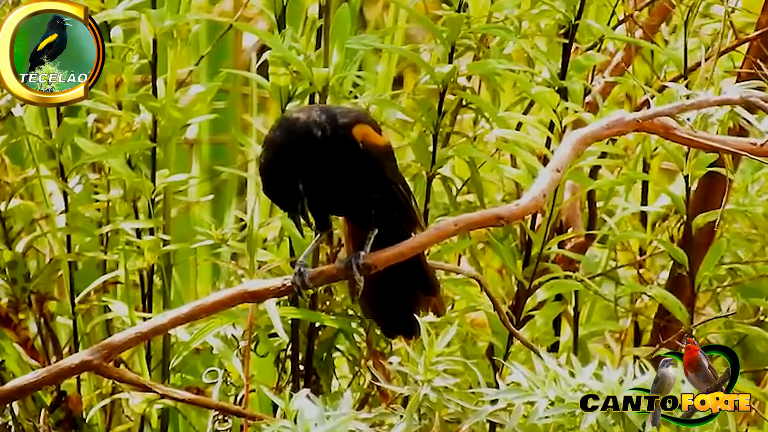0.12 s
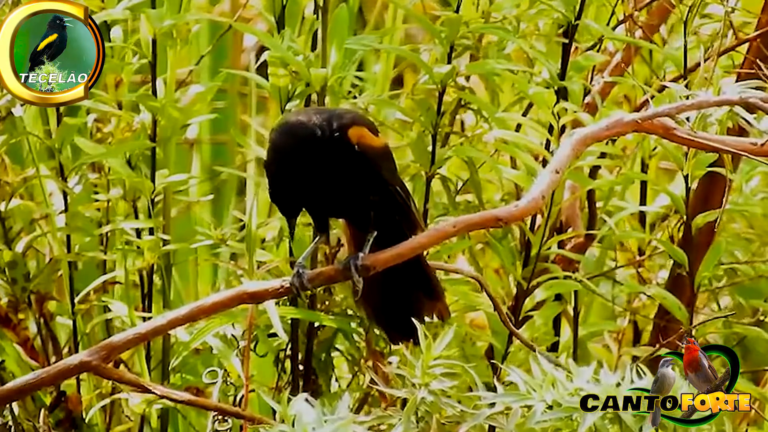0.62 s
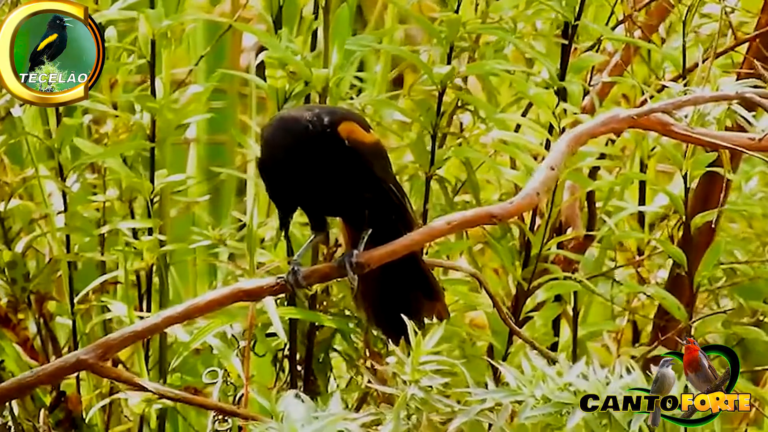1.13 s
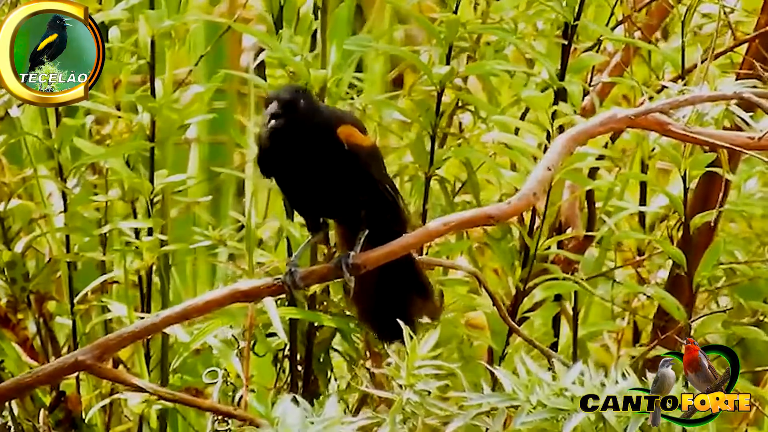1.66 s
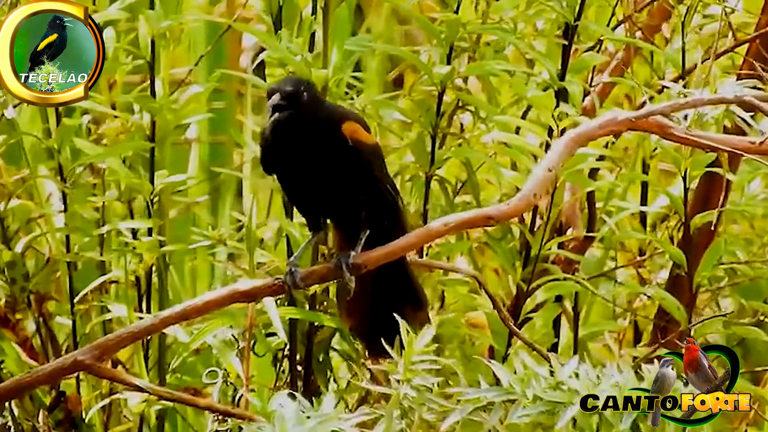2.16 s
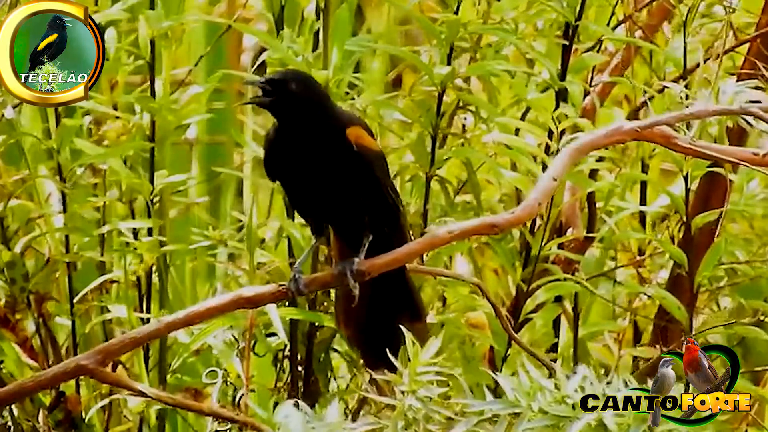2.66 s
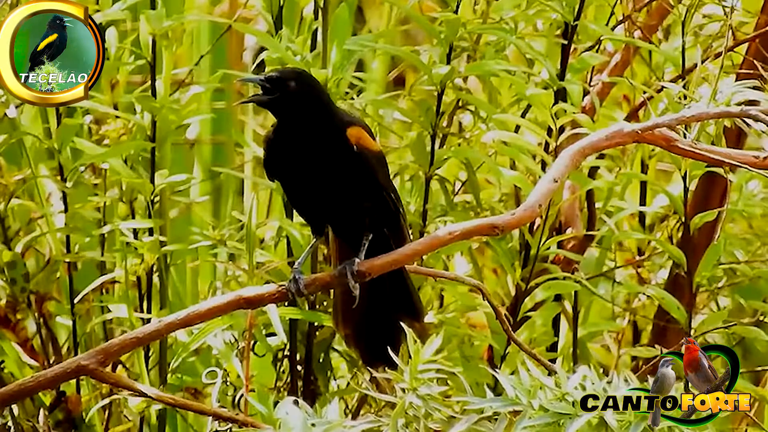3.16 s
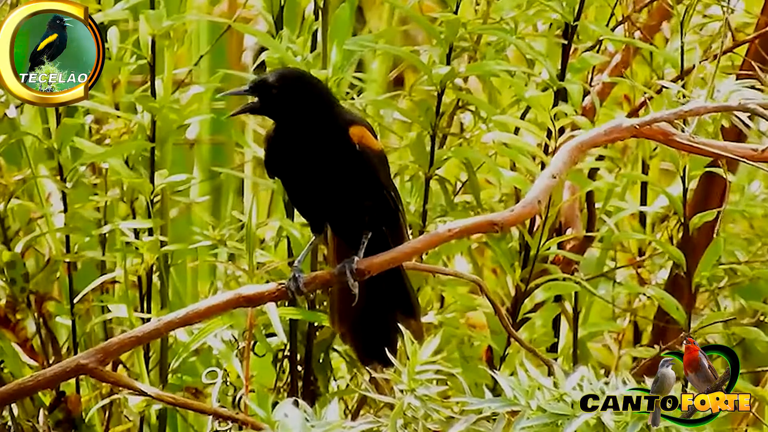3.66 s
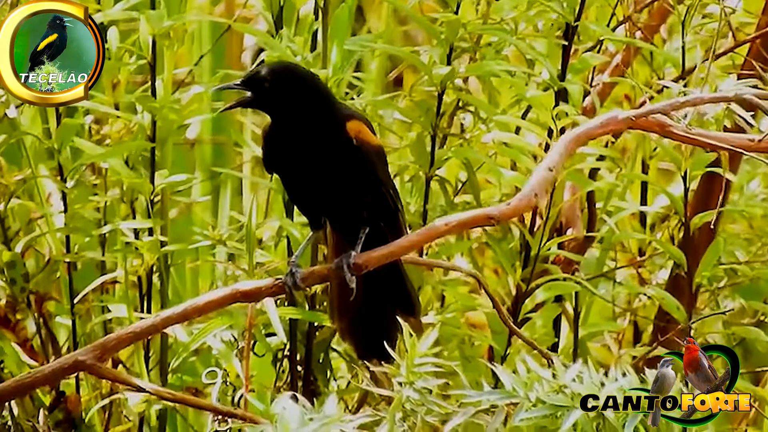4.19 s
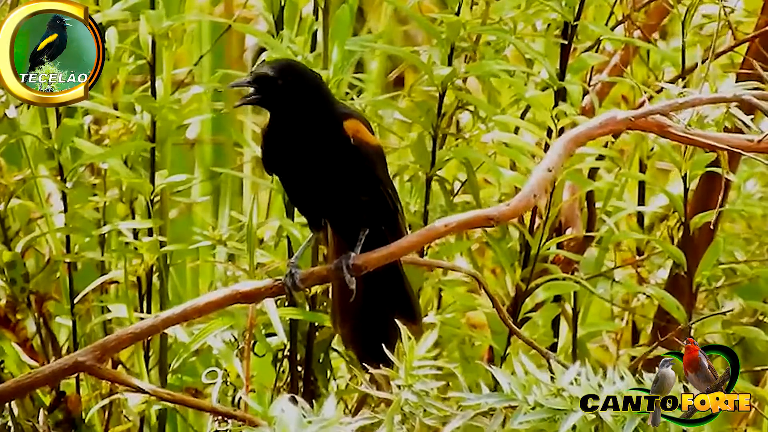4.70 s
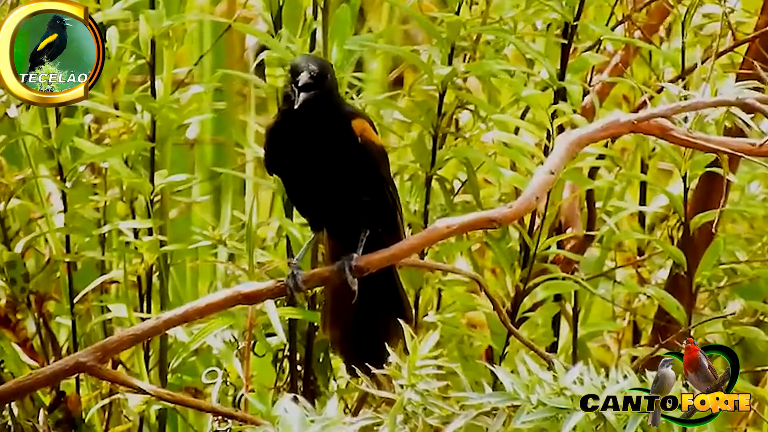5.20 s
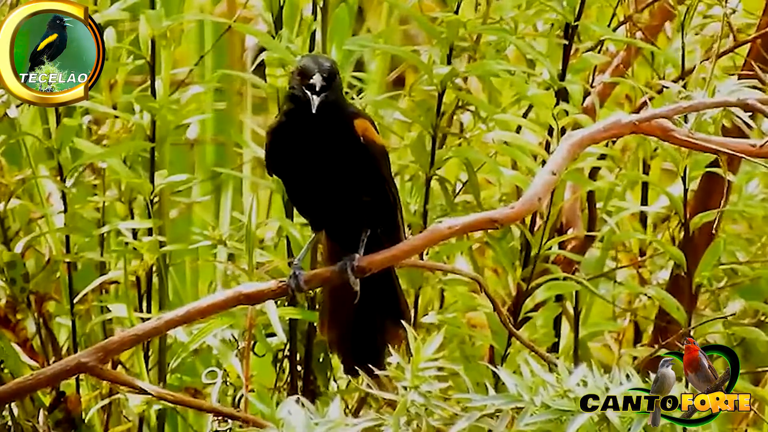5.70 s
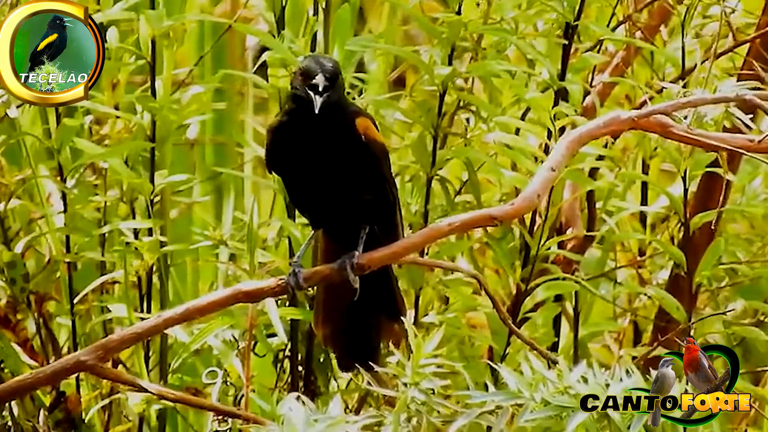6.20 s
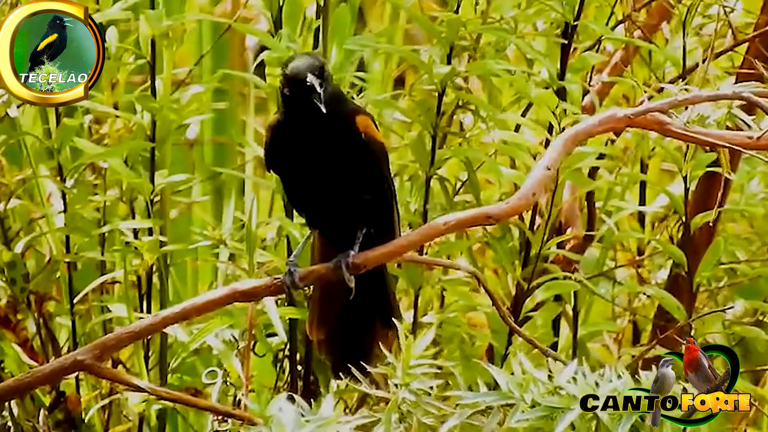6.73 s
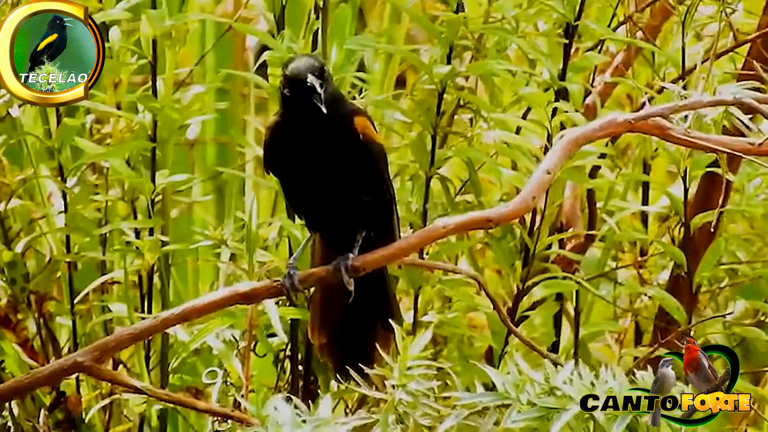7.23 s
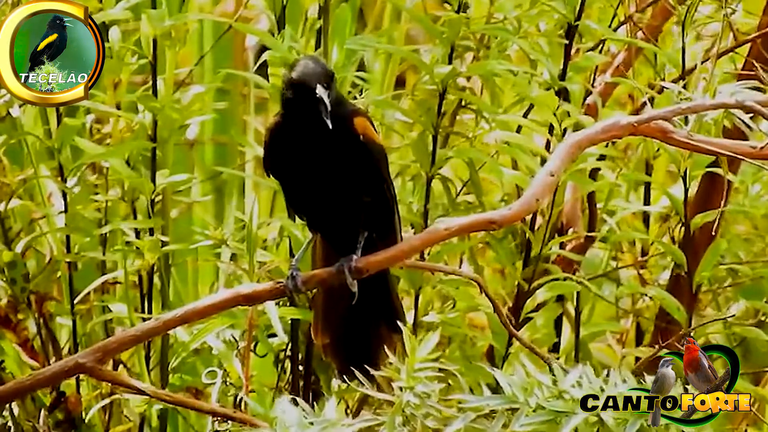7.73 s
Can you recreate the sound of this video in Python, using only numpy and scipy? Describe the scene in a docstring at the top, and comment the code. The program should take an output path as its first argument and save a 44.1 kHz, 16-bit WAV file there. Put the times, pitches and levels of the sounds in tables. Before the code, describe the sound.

In dense foliage, a close songbird gives a harsh, two-toned rasping call, then another three seconds later. Leaves hiss steadily, faint birds twitter and whistle far away, and sharp chips echo between. A gust briefly thumps the microphone. A small bird then trills quickly in two runs, and two loud falling whistles from a near bird close the scene.

```python
"""Leaves hiss, wind rumbles and mostly dies away by 5.6 s, and tiny birds twitter around far gliding whistles.
A songbird gives harsh two-voiced calls at 0.5 and 3.5 s; sharp chips and a faint insect drone join in.
A gust thumps the microphone at 2 s, a nearer whistle rises, and from 4 s a small bird trills.
A low hum and a soft hoot come late; a near bird ends with two falling whistles.
Voices are sums of partials, air is filtered noise, and leaves scatter the bird voices into a short echo."""
import sys
import numpy as np
from scipy import signal
from scipy.fft import rfft, irfft, next_fast_len
from scipy.io import wavfile
from scipy.ndimage import uniform_filter1d, map_coordinates

SR = 44100
rng = np.random.default_rng(int(sys.argv[2]) if len(sys.argv) > 2 else 0)


def gain_from_db(level_db):
    """Turn a decibel level (scalar or array-like) into a linear amplitude factor."""
    decades = np.asarray(level_db, float) / 20
    return 10 ** decades


def wav_out(sig):
    """Save sig, one row per channel (or a flat mono array), as 16-bit PCM at SR to the path in sys.argv[1]."""
    wavfile.write(sys.argv[1], SR, np.round(np.clip(np.atleast_2d(sig).T, -1, 1) * 32767).astype(np.int16))


N = 346626
T = np.arange(N) / SR


def unit(x):
    """Normalisation: scales a signal to rms 1."""
    return x / np.sqrt(np.mean(x ** 2) + 1e-20)


def along(points, hz):
    """Logarithmic pitch scale: interpolates (Hz, value) points along log frequency."""
    f, v = np.transpose(points)
    return np.interp(np.log(hz + 1), np.log(f + 1), v)


def wobble(rate, size=N):
    """Band-limited fluctuation: a smooth random curve with rate knots a second."""
    knots = rng.standard_normal(int(size * rate / SR) + 4)
    return map_coordinates(knots, [np.arange(size) * rate / SR])


def coloured(x, points):
    """Linear filtering: multiplies the spectrum of x by a curve of (Hz, dB) points."""
    m = next_fast_len(N + 8192)
    gain = gain_from_db(along(points, np.fft.rfftfreq(m, 1 / SR)))
    return irfft(rfft(x, m) * gain, m)[..., :N]


def causal(x, points, smear):
    """Minimum-phase resonance from a folded cepstrum; smear adds a phase shift at each frequency."""
    m = 2 * next_fast_len(N // 2 + 4096)
    log_gain = np.log(gain_from_db(along(points, np.fft.rfftfreq(m, 1 / SR))))
    cepstrum = irfft(log_gain, m)
    cepstrum[1:m // 2] *= 2
    cepstrum[m // 2 + 1:] = 0
    response = np.exp(rfft(cepstrum) + 1j * smear(m // 2 + 1))
    return irfft(rfft(x, m) * response, m)[:N]


def note(rows, fade=0.0014):
    """Envelope: the samples that a table spans, an edge with linear fades (s), and its interpolated columns."""
    s, *cols = np.transpose(rows)
    at = slice(max(round(s[0] * SR), 0), round(s[-1] * SR))
    edge = np.clip(np.minimum(T[at] - s[0], s[-1] - T[at]) / fade, 0, 1)
    return at, edge, [np.interp(T[at], s, c) for c in cols]


def phase(hz):
    """Phase is the integral of frequency, here from a random starting angle."""
    return 2 * np.pi * (np.cumsum(hz) / SR + rng.random())


def whistle(notes, overtones, waver_db):
    """Near-sinusoidal whistling: gliding sines with any listed (frequency ratio, dB) overtones."""
    out = np.zeros(N)
    for rows in notes:
        at, edge, (hz, db) = note(rows)
        p = phase(hz)
        tone = np.sin(p) + sum(gain_from_db(level) * np.sin(k * p) for k, level in overtones)
        loudness = gain_from_db(db + waver_db * wobble(80.7, size=len(hz)))
        out[at] += np.sqrt(2) * edge * loudness * tone
    return out


# Decay of the scatter among leaves and trunks, before the factor far: pitch_hz, t60_s
SCATTER_DECAY = [(800, 0.17), (3000, 0.27), (6000, 0.18), (12000, 0.17)]


def foliage(x, wet_db, delay, far=1):
    """Multiple scattering: adds a delayed (s), decaying noise echo; far multiplies its decay time."""
    hz, t, z = signal.stft(rng.standard_normal(SR), SR, nperseg=256)
    t60 = along(SCATTER_DECAY, hz)[:, None] * far
    tail = signal.istft(z / 1000 ** (t / t60), SR, nperseg=256)[1]
    tail = np.pad(tail / np.linalg.norm(tail), (round(delay * SR), 0))
    return x + gain_from_db(wet_db) * signal.fftconvolve(x, tail)[:N]


# Spectrum of the leaf hiss: pitch_hz, relative level_db per Hz
LEAF_SPECTRUM = [(30, -60), (88, -46.5), (150, -17.5), (314, 0), (708, 4), (1240, 3.5), (2600, -2.5),
                 (4310, -6.5), (5030, -3), (5760, -6), (6110, -5.5), (6600, -6), (7270, -11), (15500, -20)]


def leaf_hiss():
    """Broadband turbulence noise in two independent parts: one shared by both ears, one sideways."""
    noise = unit(coloured(rng.standard_normal((2, N)), LEAF_SPECTRUM))
    shared, sideways = gain_from_db(-60 + 0.87 * wobble(4.5)) * noise
    return shared, coloured(sideways, [(100, -6.0), (1000, -26.5), (8000, -15.5), (15000, -4.5)])


# Wind rumble over time: time_s, level_db
RUMBLE_LEVEL = [(0, -70.5), (2.032, -71.5), (2.06, -60.5), (2.2, -70.5), (5, -75), (5.6, -95), (7.86, -85)]
# Spectrum of the rumble: pitch_hz, relative level_db per Hz
RUMBLE_SPECTRUM = [(12, -20.5), (20, 5), (65, -5), (99, 1), (155, -7), (250, -5.5), (320, -39.5),
                   (550, -120)]


def wind_rumble():
    """Wind noise at the microphone: low-frequency random pressure with a slowly varying level."""
    s, db = np.transpose(RUMBLE_LEVEL)
    noise = unit(coloured(rng.standard_normal(N), RUMBLE_SPECTRUM))
    return gain_from_db(np.interp(T, s, db) + 1.1 * wobble(10)) * noise


# A crowd too far to tell apart; each glide varies about these: time_s, level_db, middle pitch_hz
TWITTER_CROWD = [(0, -49, 4855), (.5, -60.5, 5130), (1.1, -70.5, 4210), (5.6, -70.5, 4504),
                 (5.9, -53.5, 4340), (6.15, -50, 4490), (6.3, -68, 4990), (7.6, -48.5, 4834),
                 (7.86, -35, 4480)]


def twitter(count=450):
    """Superposition of many quick random glides, mostly falling, blurred by distance."""
    s, db, hz = np.transpose(TWITTER_CROWD)
    notes = []
    for u, length, pitch, bend, size in rng.random((count, 5)):
        start = u * (s[-1] - .1)
        end = start + .006 + .012 * length
        start_hz = np.interp(start, s, hz) * (.75 + .4 * pitch)
        end_hz = start_hz * (1.2 - .65 * bend)
        level_db = np.interp(start, s, db) + 10 * size - 14
        notes.append([(start, start_hz, level_db), (end, end_hz, level_db - 3)])
    return foliage(whistle(notes, [], waver_db=2), wet_db=-2, delay=.01, far=1.2)


# Far whistles, one glide a row: start_s, length_s, from_hz, to_hz, level_db at the loudest point; the last row
# is an echo of the near bird's first falling whistle
FAR_GLIDES = [(0, 0.034, 4660, 2850, -41.5), (.035, 0.046, 2810, 1550, -51.5),
              (.075, .018, 1535, 2100, -52), (.092, 0.019, 2100, 1320, -60),
              (0.095, 0.21, 2560, 3750, -52.5), (.2, 0.034, 1676, 1900, -56), (.4, 0.04, 1245, 1750, -58),
              (0.311, 0.075, 4270, 4150, -43.5), (0.436, 0.027, 2570, 2220, -54.5),
              (0.464, 0.025, 3090, 2210, -52), (2.201, 0.076, 3134, 2147, -52),
              (2.623, 0.057, 5770, 4000, -57.5), (2.631, 0.085, 2920, 2840, -53.5),
              (2.678, 0.042, 3465, 1950, -55.5), (2.683, 0.033, 3080, 3084, -49.5),
              (2.819, 0.038, 5130, 4500, -55.5), (2.891, 0.087, 3070, 3150, -52.5),
              (2.968, 0.052, 3570, 1890, -51.5), (3.027, 0.068, 5000, 1605, -53),
              (3.107, 0.074, 2500, 1470, -59), (3.296, 0.045, 4640, 4050, -56),
              (4.451, 0.11, 2980, 3510, -65), (4.663, 0.18, 5080, 3200, -62.5),
              (5.073, 0.15, 4772, 3010, -63.5), (5.199, 0.076, 4850, 2410, -61),
              (5.434, 0.038, 4950, 2780, -60.5), (5.588, .13, 4380, 3050, -66.5),
              (5.76, 0.11, 1290, 1560, -65), (5.782, 0.025, 4000, 3720, -53.5),
              (5.821, 0.023, 2990, 3050, -45.5), (5.85, 0.032, 3370, 2200, -61),
              (5.88, .03, 4600, 3700, -57.5), (6.442, 0.096, 5150, 3810, -60),
              (6.46, 0.039, 2060, 1384, -59.5), (6.492, 0.038, 1480, 1630, -58.5),
              (6.779, 0.027, 2006, 1290, -53), (6.799, 0.041, 1317, 1597, -50.5),
              (6.899, 0.027, 2300, 3690, -57), (6.929, 0.036, 1900, 2220, -49),
              (6.963, 0.045, 2142, 1976, -51), (7.009, 0.081, 3085, 3480, -50),
              (7.078, 0.031, 2710, 1950, -61.5), (7.291, 0.029, 4100, 3200, -56.5),
              (7.498, 0.024, 4370, 3970, -50.5), (7.537, 0.048, 2650, 3100, -52.5),
              (7.576, 0.048, 3300, 1820, -55.5), (7.589, 0.021, 1350, 1013, -35.5)]


def far_whistles():
    """Frequency glides under an exponential swell and fade, the same rule for each."""
    peak_at = .4  # share of the note
    swell_db, fade_db = 110, 190  # dB a second
    notes = []
    for s, length, hz, end_hz, db in FAR_GLIDES:
        rise_s, fall_s = peak_at * length, (1 - peak_at) * length
        notes.append([(s, hz, db - swell_db * rise_s),
                      (s + rise_s, hz * (end_hz / hz) ** peak_at, db),
                      (s + length, end_hz, db - fade_db * fall_s)])
    return foliage(whistle(notes, [(2.3, -32.0)], waver_db=4.5), wet_db=-9.0, delay=0.0079)


# Windpipe and open beak: pitch_hz, gain_db
OPEN_THROAT = [(350, -87.5), (700, -45.5), (1000, -23.5), (1400, -26.5), (1900, -11.5), (2800, -4.5),
               (4200, -2.5), (5200, -20.5), (6500, -45.5), (8000, -21.5), (11000, -40.5), (13500, -32),
               (15500, -50.5)]
# Windpipe with the beak nearly shut: pitch_hz, gain_db
SHUT_THROAT = [(350, -90), (800, -41), (1100, -33), (1600, -10.5), (2400, 0), (3300, 0.5), (4200, -16),
               (5200, -42.5), (6500, -53.5), (8000, -44), (15500, -70)]
# The calls: start_s, level_db, pitch factor, time stretch of the part after the break
HARSH_CALLS = [(.526, .5, 1.001, 1.03), (3.515, 0, 1.003, .98)]
# Both sides of the voice box, before a call's own factors:
# time_s, low_hz, low third partial level_db, high_hz, high second partial level_db
VOICE_BOX = [(0, 701, -46.5, 1103, -45.5), (.024, 789, -24, 1191, -26), (.043, 920, -14.5, 1325, -18),
             (.062, 995, -17.5, 1410, -18), (.09, 1024, -18.5, 1437, -19.5),
             (.122, 975.3, -20.5, 1386, -24.5), (.166, 896.7, -22.5, 1347, -28),
             (.236, 886.4, -26, 1331, -24), (.258, 706.2, -35, 1152, -27), (.378, 655, -38, 1025, -30),
             (.42, 843.2, -28.5, 945, -38), (.478, 757.3, -32.5, 886, -57), (0.499, 740, -62.5, 846, -62.5)]
# Beak movement: time_s after the call's start, opening (0-1)
BEAK_OPENING = [(0, .6), (.03, .94), (.236, .94), (.26, .35), (.4, .1), (.5, .08)]


def harsh_calls():
    """Nonlinear coupling: two pulsing membranes modulate each other, giving sum and difference tones."""
    break_s = 0.29  # after the start; the time stretch begins here
    wide, shut = np.zeros((2, N))
    for start, call_db, factor, stretch in HARSH_CALLS:
        rows = np.array(VOICE_BOX) * [1, factor, 1, factor, 1]
        rows[:, 0] += (stretch - 1) * np.clip(rows[:, 0] - break_s, 0, None)
        rows = rows + [start, 0, call_db, 0, call_db]
        at, edge, (low_hz, low_db, high_hz, high_db) = note(rows)
        size = len(edge)

        # near 3:2 the two sides lock and the rasp clears
        locked = abs(high_hz / low_hz - 3 / 2) < 1 / 70
        high_hz = np.where(locked, low_hz * 3 / 2, high_hz)
        rasp = 1 - 0.5 * uniform_filter1d(1. * locked, size=400)

        beak = np.interp(T[at] - start, *np.transpose(BEAK_OPENING))

        def throat_db(hz):
            """Resonance interpolated between the shut and the open beak."""
            return beak * along(OPEN_THROAT, hz) + (1 - beak) * along(SHUT_THROAT, hz)

        # more effort, sharper pulses, more treble
        r = np.clip(0.96 + 0.012 * (low_db + 16.5), .4, .86)

        def pulses(hz):
            """Harmonic series in closed form: partial k has size r^k."""
            c = np.cos(phase(hz))
            return r * (c - r) / (1 - 2 * r * c + r * r)

        # unsteady air flow jitters both pitches
        low = pulses(low_hz * (1 + .008 * rasp * wobble(250, size=size)))
        high = pulses(high_hz * (1 + 0.0081 * rasp * wobble(250, size=size)))
        low_gain = gain_from_db(low_db - throat_db(3 * low_hz)) / r ** 3
        high_gain = gain_from_db(high_db - throat_db(2 * high_hz)) / r ** 2
        product = gain_from_db(-8) * np.sqrt(low_gain * high_gain) * low * high
        voiced = low_gain * low + high_gain * high + product

        # turbulence gated by the low side, hoarser as the beak shuts
        breath_gain = gain_from_db(-13.0) * rasp * (2 - beak) * (low_gain + high_gain)
        breath = breath_gain * (1 + low) * rng.standard_normal(size)
        voice = np.sqrt(2) * edge * (voiced + breath)
        wide[at] = voice * beak
        shut[at] = voice * (1 - beak)

    # the nearest leaves spread each pulse over a few milliseconds
    knots = 2.5 * rng.standard_normal(110)  # radians

    def smear(size):
        """Dispersion: a smooth random phase over frequency."""
        return map_coordinates(knots, [np.linspace(0, len(knots) - 1, size)])

    dry_call = causal(wide, OPEN_THROAT, smear) + causal(shut, SHUT_THROAT, smear)
    return foliage(dry_call, wet_db=-14.0, delay=.006)


# Sharp chips, before the note shape: time_s, level_db, pitch_hz
CHIP_NOTES = [(1.1229, -41.5, 5600), (1.5597, -29.5, 5745), (2.6763, -49.5, 5300), (3.2233, -27, 5544),
              (4.129, -47, 5290), (5.6428, -32, 6360), (6.727, -38, 5690), (6.882, -47, 5650)]


def chips():
    """Transient excitation: a few milliseconds of falling tone, heard mostly as echo."""
    notes = [[(s - .004, 1.07 * hz, db - 25.0), (s + 0.0019, 1.02 * hz, db - 3),
              (s + 0.014, .95 * hz, db - 10)] for s, db, hz in CHIP_NOTES]
    return foliage(whistle(notes, [(1.98, -28.5)], waver_db=-4), wet_db=-0.5, delay=0.0052, far=0.87)


# Far buzzing insect: time_s, pitch_hz, level_db before a 2 dB lift
INSECT_LINE = [(1.38, 1234, -60), (1.72, 1252, -63), (1.85, 1343, -61), (2.55, 1306, -64),
               (2.65, 1406, -58), (3.5, 1380, -60.5)]


def insect_drone():
    """Random frequency and amplitude modulation: a fuzzy line with its half pitch."""
    out = np.zeros(N)
    at, edge, (hz, db) = note(INSECT_LINE, fade=0.027)
    size = len(hz)
    p = phase(hz * (1 + 0.0216 * wobble(90, size=size)))
    level_db = db + 2 + 4.0 * wobble(60.05, size=size) + 2.9 * wobble(9.37, size=size)
    out[at] = edge * gain_from_db(level_db) * (np.sin(p) + gain_from_db(-10) * np.sin(p / 2))
    return out


# Gust on the microphone: start_s, level_db, final pitch_hz, t60_s, extra cycles while the pitch drops
GUST = (2.043, -26, 27, .24, .55)


def gust_thump():
    """Damped oscillation: a low sine settles in pitch as it decays."""
    s, db, hz, t60, extra = GUST
    t = np.clip(T - s, 0, None)
    cycles = hz * t + extra * (1 - np.exp(-t / 0.03))
    envelope = gain_from_db(db) / 1000 ** (t / t60) * (1 - np.exp(-t / 0.023))
    return envelope * np.sin(2 * np.pi * cycles)


# A nearer rising whistle: time_s, pitch_hz, level_db
RISING_GLIDE = [(2.34, 5220, -81), (2.4, 5440, -49), (2.45, 5550, -32.5), (2.485, 5840, -35.5),
                (2.52, 6370, -42), (2.57, 6460, -55)]


def rising_whistle():
    """Upward frequency glide: a sine with one weak overtone near its octave."""
    return foliage(whistle([RISING_GLIDE], [(2.02, -40.0)], waver_db=2.5), wet_db=-9.0, delay=0.0079)


# Trill notes: start_s
TRILL_STARTS = [4.084, 4.188, 4.265, 4.361, 4.473, 4.58, 4.692, 4.8, 4.907, 5.017, 5.122, 5.226, 5.329,
                5.433, 5.54, 5.638, 5.727, 5.823, 5.909, 5.984, 6.383, 6.486, 6.61, 6.729, 6.842, 6.954,
                7.067, 7.173, 7.278, 7.371]
# The trill swells and sags twice, then swells again:
# time_s, level_db before the note shape, held pitch_hz, rise of the tip (share of pitch), time stretch
TRILL_SWELL = [(4.08, -57, 6180, 0.032, 0.78), (4.4, -54.5, 6120, .04, 1.14), (4.8, -49, 6134, 0.057, 1.2),
               (5.43, -45, 6000, 0.14, 1.01), (5.99, -52, 5300, .03, 0.47), (6.38, -54, 6670, 0.037, 0.74),
               (6.49, -47, 6980, .14, .98), (6.84, -51, 6330, 0.196, 0.83),
               (6.961, -44.5, 6070, 0.13, 0.84), (7.372, -44.5, 5900, .12, 0.92)]
# Shape of one note: time_s before stretching, pitch factor, level_db relative to the swell
TRILL_SHAPE = [(-.007, .78, -12.5), (0, .99, -3.5), (.024, 1.01, -8), (0.03, 1.02, -27), (.037, 1.01, -14),
               (.045, .76, -11.5)]


def trill():
    """Periodic repetition of one pitch contour: each note flicks up, holds, tips over and drops."""
    when, *effort = np.transpose(TRILL_SWELL)
    notes = []
    for s in TRILL_STARTS:
        db, hz, tip, stretch = (np.interp(s, when, c) for c in effort)
        shape = np.array(TRILL_SHAPE) * [stretch, hz, 1]
        rows = shape + [s, 0, db + 1.0 * rng.standard_normal()]
        rows[3, 1] *= 1 + tip
        notes.append(rows)
    return foliage(whistle(notes, [], waver_db=0.5), wet_db=-2.5, delay=0.005, far=1.9)


# Low hum over time: time_s, level_db
HUM_LEVEL = [(6.03, -58), (6.124, -56), (7.4, -55), (7.86, -51)]
# Spectrum of the hum: pitch_hz, relative level_db per Hz
HUM_SPECTRUM = [(60, -47), (150, -25), (260, -10.5), (350, 7), (480, 7), (650, -3), (1000, -39.5)]


def low_hum():
    """Narrow-band noise: a band around 400 Hz heard as a hoot-like hum."""
    out = np.zeros(N)
    at, edge, (db,) = note(HUM_LEVEL, fade=0.062)
    noise = unit(coloured(rng.standard_normal(N), HUM_SPECTRUM))
    out[at] = edge * gain_from_db(db + 1.7 * wobble(27, size=len(db))) * noise[at]
    return out


# Soft low hoot: time_s, pitch_hz, level_db before an 8.5 dB lift
HOOT_LINE = [(7.4, 433.4, -56.5), (7.654, 433.7, -54.5), (7.86, 417, -65.5)]


def hoot():
    """Pure tone with random frequency modulation: a soft low line."""
    out = np.zeros(N)
    at, edge, (hz, db) = note(HOOT_LINE, fade=0.022)
    size = len(hz)
    level = gain_from_db(db + 8.5 + 1.9 * wobble(23.7, size=size))
    out[at] = edge * level * np.sin(phase(hz * (1 + 0.013 * wobble(40, size=size))))
    return out


# Falling whistles before the throat: start_s, level_db, overtones level_db relative to the fundamental
FALL_STARTS = [(7.455, -16, -33.5), (7.705, -13, -28)]
# Shape of one fall: time_s after the start, pitch_hz, level_db relative to the whistle
FALL_SHAPE = [(0, 1552, -27), (.009, 1582, -6.5), (.025, 1629, -3.5), (.044, 1558, 0.3), (.067, 1285, -5.5),
              (.1, 990, -20), (.147, 800, -30.5)]
# Throat of the near bird: pitch_hz, gain_db
NEAR_THROAT = [(2000, 0.5), (3300, -11), (4800, -4.5), (6500, -10.5), (8200, -7.5), (9700, 5),
               (11500, -41.5)]


def falls():
    """Source and filter: a short hold, then a drop of about an octave, coloured by the throat."""
    tones = np.zeros(N)
    for s, db, over_db in FALL_STARTS:
        rows = np.array(FALL_SHAPE) + [s, 0, db]
        tones += whistle([rows], [(k, over_db) for k in range(3, 9)], waver_db=1.3)
    return foliage(coloured(tones, NEAR_THROAT), wet_db=-20, delay=0.022, far=1.74)


def scene():
    """Superposition in stereo: the voices sit in the middle, the near whistler a little to the left."""
    mid, side = leaf_hiss()
    mid = mid + wind_rumble() + twitter() + far_whistles() + harsh_calls() + chips()
    mid = mid + insect_drone() + gust_thump() + rising_whistle() + trill() + low_hum() + hoot()
    return mid + side * np.array([[1], [-1]]) + falls() * gain_from_db([[.3], [-.3]])


def top_cut(x):
    """Nothing passes above the cut-off."""
    return signal.sosfilt(signal.butter(12, 15650, fs=SR, output="sos"), x)


def record(dry):
    """Signal chain: the finished mix goes straight to its last stage."""
    return top_cut(dry)


dry = scene()
out = record(dry)
wav_out(out)
```